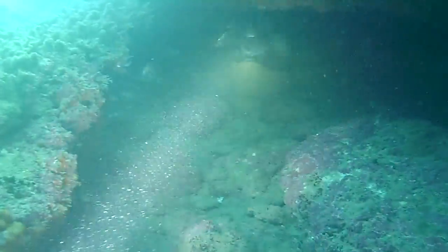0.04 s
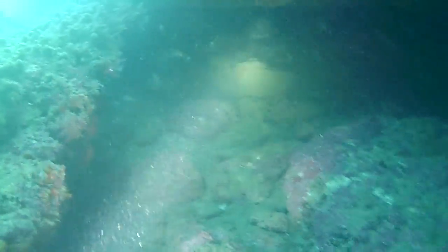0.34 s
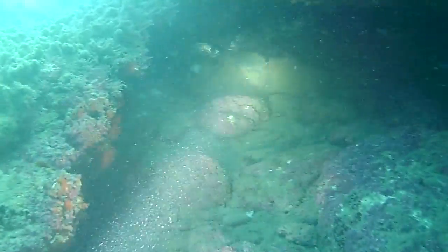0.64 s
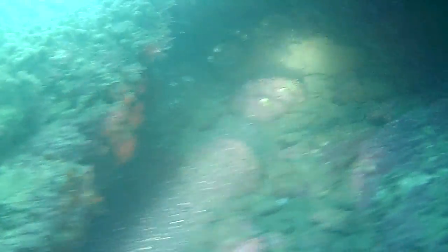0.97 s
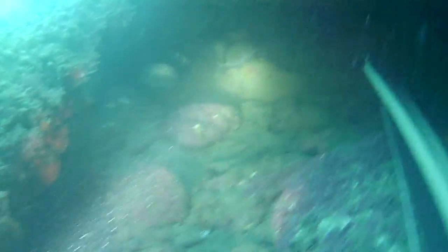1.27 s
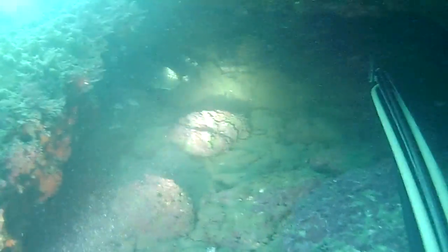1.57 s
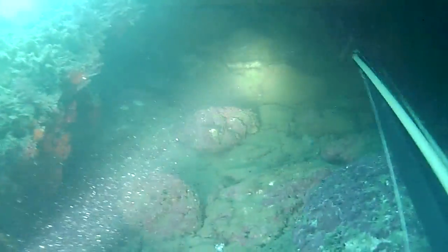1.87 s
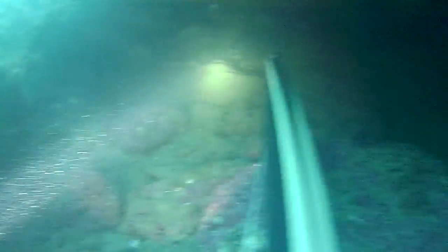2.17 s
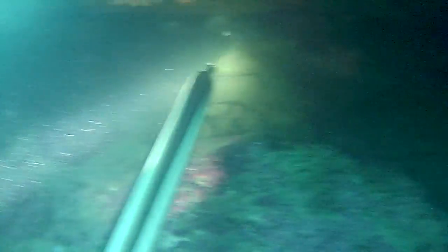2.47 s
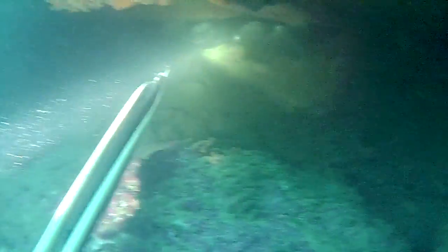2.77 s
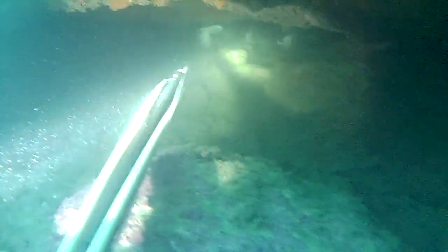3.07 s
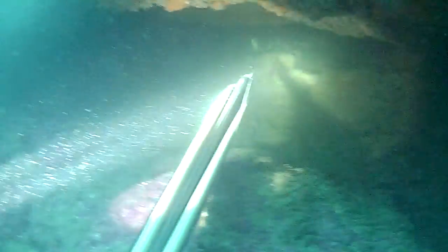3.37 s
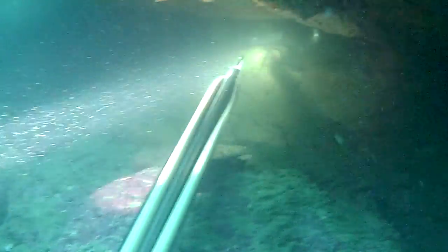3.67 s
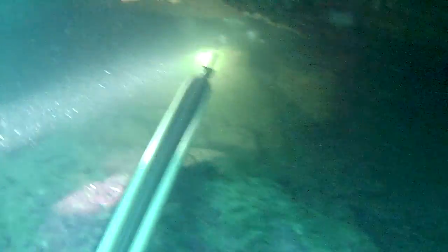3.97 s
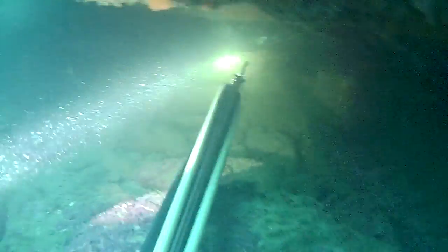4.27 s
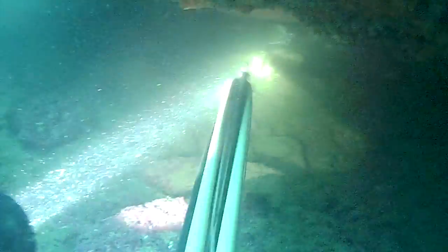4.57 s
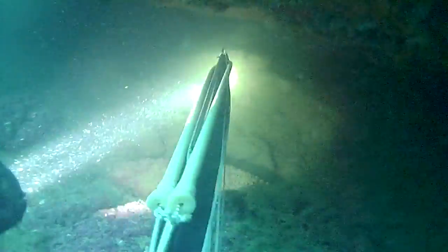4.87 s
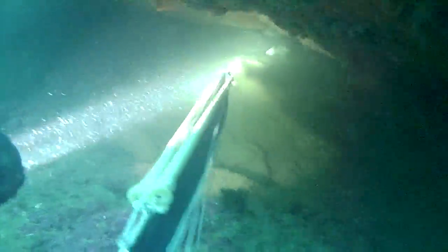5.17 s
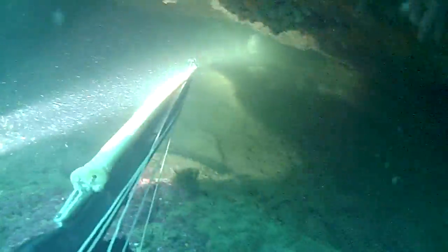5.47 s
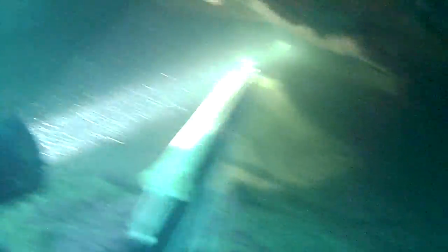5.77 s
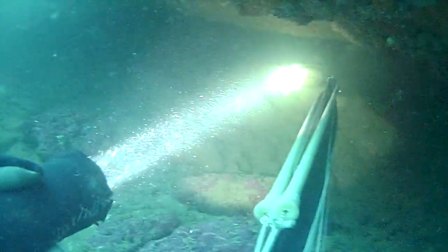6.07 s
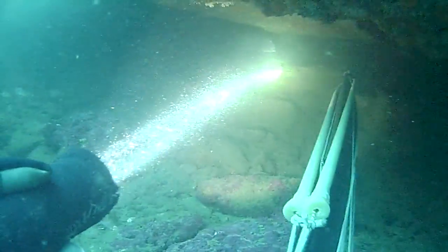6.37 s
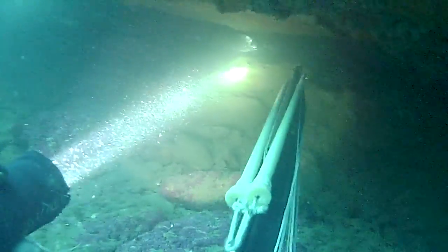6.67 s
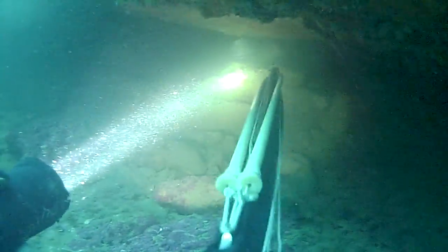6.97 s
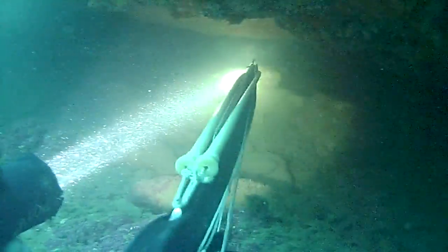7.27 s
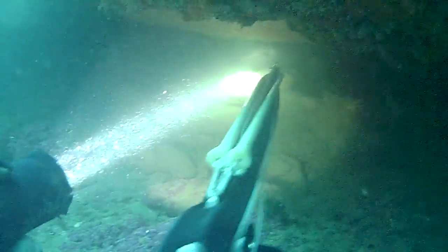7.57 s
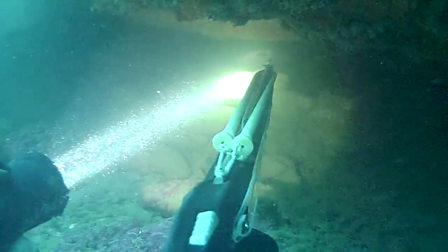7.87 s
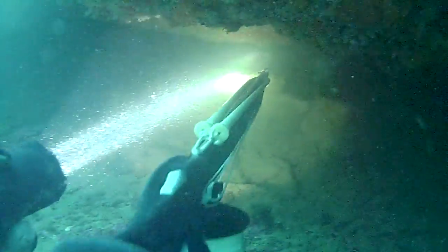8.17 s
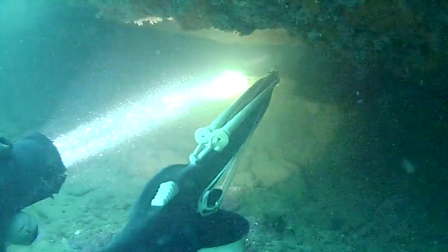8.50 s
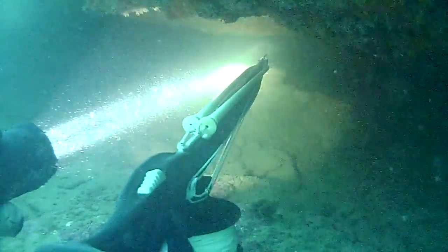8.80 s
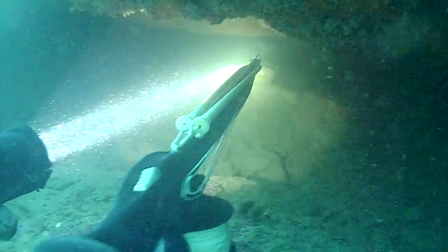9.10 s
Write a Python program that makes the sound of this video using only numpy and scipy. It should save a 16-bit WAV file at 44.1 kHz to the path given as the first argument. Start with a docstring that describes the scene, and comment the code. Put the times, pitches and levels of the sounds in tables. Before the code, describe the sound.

A low underwater rumble and soft fluttering wash run throughout, heard from inside a sealed camera housing, swelling within the first second. A diver's gear knocks irregularly on the case right at the microphones, several times a second, giving short hollow knocks, brighter clicks and brief scuffs. The two hardest, loudest blows land at about 1.2 and 2.2 seconds, each with a quick rebound; another sharp one comes at 4.2. Trapped air gives small low gulps around 0.6, 1.5, 1.7 and 4.5 seconds. After about 5 seconds the knocks become sparser and softer, and the water eases from around 6. Snapping shrimp make a faint, slowly fading crackle, with scattered close snaps, the sharpest near 7.7 seconds. A low thump, a scuff and a bright click come at about 8.7 seconds. The whole sound is muffled, with little high treble.

```python
"""Inside an underwater rock cave, on the two microphones of a camera in a sealed housing, carried in by
a diver with a speargun and a torch. Right at the microphones, gear knocks and scuffs ring the housing's
modes; a harder contact is brighter, and the heaviest blows overload the input. Moving water presses on
the case as a deep rumble and trapped air gurgles. Snapping shrimp crackle on the reef all around,
a few close by, the rest far off and fading."""
import sys
import numpy as np
from scipy import signal
from scipy.fft import rfft, irfft, next_fast_len
from scipy.io import wavfile
from scipy.ndimage import uniform_filter1d

SR = 44100
rng = np.random.default_rng(int(sys.argv[2]) if len(sys.argv) > 2 else 0)


def master(y):
    """Save y as 16-bit WAV."""
    cut = np.clip(np.atleast_2d(y).T, -1, 1)
    pcm = np.round(cut * 32767)  # scale
    wavfile.write(sys.argv[1], SR, pcm.astype(np.int16))


N = 407484
RING = 4096  # samples allowed for one contact to ring out

# Gear knocking on the housing. Each row: start in seconds, relative force in dB,
# contact corner in Hz (higher is harder), extra weight in the low modes in dB.
GEAR_KNOCKS = [(0.276, -3, 330, -23), (0.2845, -15, 4450, -7), (0.2967, -13, 2420, -2),
               (0.3803, -19.5, 640, 9), (0.5539, -16.5, 1210, 12.5), (0.5717, -15.5, 1080, 3),
               (0.5948, -5.5, 950, 3), (0.6257, -11, 520, 6), (0.789, -13.5, 480, -24),
               (1.01, -24.5, 1330, 5), (1.1161, -11.5, 2190, -1), (1.1697, 6.5, 4950, -3.5),
               (1.4327, -13.5, 1120, 2), (1.4631, -8, 580, 1), (1.4744, -4.5, 730, -7),
               (1.657, -13, 770, -2.5), (1.719, -10.5, 830, -11.5), (1.7664, -10.5, 560, -5),
               (2.0176, -17, 490, -1), (2.1197, -5, 4450, -11), (2.1735, -9, 4450, -6.5),
               (2.1805, 8, 5500, -15), (2.4272, -6, 955, -7), (2.5177, -17.5, 1400, -1),
               (2.5497, -13, 790, 4.5), (2.77, -11, 4450, -8), (2.8075, -14.5, 2720, 8),
               (2.852, -19, 2110, 13), (2.966, -12.5, 300, -4.5), (3.043, -2.5, 480, -10),
               (3.222, -10.5, 580, 3.5), (3.244, -30, 1420, 19), (3.3017, -24, 400, 15.5),
               (3.4536, -19, 470, 11), (3.6003, -11.5, 450, 5), (3.7146, -12, 750, 15),
               (3.8064, -5.5, 1460, 3), (3.8623, -11, 350, 0.5), (3.9304, -14, 310, 5.5),
               (4.2113, -3.5, 3570, 4.5), (4.2877, -12, 1830, -1), (4.3075, -9, 380, -3.5),
               (4.4351, -18.5, 620, 12.5), (4.4669, -15.5, 580, 24.5), (4.5314, -10, 390, 0),
               (4.6042, -7.5, 500, -3), (4.887, -20, 310, 10.5), (5.7369, -20.5, 470, -4.5),
               (6.1478, -6, 430, -29), (6.1571, -18, 730, 8.5), (6.3028, -16, 530, 10.5),
               (6.9792, -20, 300, 3.5), (7.293, -19, 400, -4), (7.694, -14, 400, -14),
               (7.8451, -15.5, 400, -9.5), (8.0001, -17.5, 780, 13.5), (8.2993, -17.5, 440, -3.5),
               (8.3531, -18, 830, 17.5), (8.6469, -6.5, 300, 10), (8.7191, -6.5, 3892, -2),
               (8.8499, -18.5, 490, -6), (9.063, -24, 560, -10)]
# Gear scuffing along it. Each row: start and end in seconds, level in dB, contact corner in Hz.
GEAR_SCUFFS = [(0.298, 0.33, -34, 1480), (0.593, 0.687, -29, 230), (1.179, 1.204, -21.5, 1411),
               (1.467, 1.495, -26, 610), (1.69, 1.748, -29, 527), (2.532, 2.572, -41.5, 1070),
               (2.774, 2.783, -35.5, 2294), (3.679, 3.728, -45, 606), (3.784, 3.806, -40, 1791),
               (4.188, 4.213, -32.5, 594.5), (4.247, 4.288, -41.5, 903), (4.403, 4.52, -45, 827.5),
               (4.466, 4.516, -28.5, 117.8), (4.832, 4.955, -44.5, 351), (5.656, 5.705, -50, 197),
               (6.15, 6.181, -43.5, 697), (6.599, 6.797, -57.5, 247), (6.97, 7.074, -52.5, 350.2),
               (7.283, 7.373, -59, 391.7), (8.641, 8.711, -38, 255.8), (8.648, 8.705, -50.5, 3001)]
# The case around the microphones. Each row: mode frequency in Hz, width in Hz, relative level in dB.
HOUSING_MODES = [(75, 11, -12), (115, 41, -12.5), (174, 35, -16.5), (230.4, 42, -11.5), (325, 210, -18),
                 (488, 46.5, -4.5), (576.4, 49, -7), (700, 74, -14.5), (960, 150, -12.5), (1132, 92, -4.5),
                 (1258, 52, -7.5), (1496, 290, -11), (1597, 110, -1), (1676, 250, -10), (1926, 150, -15.5),
                 (1986, 62, -21), (2210, 54, -24.5), (2354, 140, -24), (2754, 200, -16), (2810, 190, -15),
                 (3420, 60, -29), (3240, 300, -29)]
# Water pressing on the case, easing as the diver slows.
# Each row: time in seconds, relative rumble level in dB, relative wash level in dB.
WATER_FLOW = [(0.0, -41, -58.5), (0.62, -31.5, -48), (1.59, -29, -54), (2.13, -30, -45.5),
              (2.42, -29, -51.5), (2.65, -30.5, -48.5), (3.4, -31.5, -51.5), (4.25, -32, -49.5),
              (4.42, -29.5, -44.5), (4.63, -32.5, -47.5), (5.3, -33, -60), (6.18, -40, -52),
              (6.36, -44, -60.5), (8.26, -40.5, -60.5), (8.62, -36.5, -55.5), (8.85, -45, -57.5),
              (9.24, -40.5, -63)]
# The tone of the rumble and of the wash. Each row: frequency in Hz, relative gain in dB.
RUMBLE_SPECTRUM = [(4, -8.5), (10, -6), (20, -8.5), (32, -15), (45, -25), (65, -35.5), (100, -52.5),
                   (200, -64.5)]
WASH_SPECTRUM = [(40, -8.5), (70, 1), (125, 3), (175, -2.5), (228, -1), (350, -11), (500, -8.5),
                 (750, -16.5), (1100, -27), (2000, -39.5)]
# Larger air pockets gurgling free. Each row: start in seconds, starting pitch in Hz, gain in dB.
AIR_POCKETS = [(0.627, 240, -11.5), (0.916, 244, -27.5), (1.478, 307, -13), (1.719, 244, -20),
               (4.479, 141, -29), (4.50, 239, -17.5), (5.11, 242, -34.5), (6.083, 215.7, -36),
               (8.672, 214.9, -34)]
# The shrimp nearest the microphones. Each row: time of the snap in seconds, relative level in dB.
NEAR_SNAPS = [(0.048, -30.5), (.14, -31.5), (0.498, -20), (0.52, -27), (.678, -24), (0.765, -25.5),
              (0.882, -26.5), (1.279, -23), (1.305, -32), (1.613, -33), (1.667, -24), (2.005, -31),
              (3.026, -31.5), (3.502, -24), (4.657, -26.5), (4.941, -30.5), (5.045, -35), (5.155, -33.5),
              (5.404, -34), (5.505, -32.5), (6.68, -31), (7.338, -33.5), (7.7356, -11.5), (7.942, -28)]
# A close snap and the distant reef, through the case wall. Each row: frequency in Hz, relative gain in dB.
SNAP_SPECTRUM = [(300, -32.5), (800, -26), (1200, -10.5), (1700, 1.5), (2000, -3), (2250, -10.5),
                 (2750, 9.5), (3100, -1), (3400, 5.5), (4000, -8), (4600, -9)]
REEF_SPECTRUM = [(500, -19.5), (1000, -12.5), (1300, -7), (1450, -10), (1650, -4.5), (2000, -7),
                 (2250, -18.5), (2500, -7), (2750, 3), (3020, -6), (3200, 0), (3450, -0.5), (4000, -9.5),
                 (4600, -26.5)]


def knocks(modes, gain_db=1, chatter_db=-22, chatter_s=.016, chatter_count=4,
           bounce_s=.0185, first_bounce_db=-12.5, bounce_step_db=-5):
    """Gear hits the case right at the microphones and chatters faintly as it rebounds."""
    out = np.zeros(N)
    for start, db, contact_hz, weight_db in GEAR_KNOCKS:
        add(out, start, undb(db + gain_db) * strike(modes, contact_hz, weight_db, scatter_db=2.05))
        for lag in rng.random(chatter_count) * chatter_s:
            chatter = strike(modes, contact_hz, weight_db, scatter_db=3)
            add(out, start + lag, undb(min(db, 0) + chatter_db) * chatter)
        if db > 0:  # the heaviest blows spring back and land twice more, each time weaker
            for k in range(2):
                bounce = strike(modes, contact_hz, weight_db, scatter_db=5)
                bounce_db = db + first_bounce_db + k * bounce_step_db
                add(out, start + (k + 1) * bounce_s, undb(bounce_db) * bounce)
    return out


def scuffs(modes, slips_per_s=700, spread_db=3):
    """Gear sticks and slips along the case: a short irregular run of contacts that swells and fades."""
    out = np.zeros(N)
    for start, end, db, contact_hz in GEAR_SCUFFS:
        length = int((end - start) * SR)
        rub = np.zeros(length + RING)
        for place in rng.random(int(slips_per_s * length / SR) + 1):
            size = np.sqrt(np.sin(np.pi * place)) * undb(spread_db * rng.standard_normal())
            slip_hz = contact_hz * np.exp(.3 * rng.standard_normal())
            i = int(place * length)
            rub[i:i + RING] += size * strike(modes, slip_hz, weight_db=0, scatter_db=8.5)
        add(out, start, undb(db) * unit(rub) * np.sqrt(length / len(rub)))
    return out


def loose_gear(modes, wash_db, count=70, gain_db=18, spread_db=4, contact_hz=420):
    """Loose gear bumps softly on the case, more strongly when the diver moves faster."""
    out = np.zeros(N)
    for place, size in zip(rng.random(count), rng.standard_normal(count)):
        db = wash_db[int(place * N)] + gain_db + spread_db * np.clip(size, -2, 1)
        add(out, place * N / SR, undb(db) * strike(modes, contact_hz, weight_db=0, scatter_db=1))
    return out


def strike(modes, contact_hz, weight_db, scatter_db, detune=0.048, lightness=0.39):
    """One contact on the case: a soft one cannot reach the high modes, a heavy one shoves the lowest."""
    s = 1j * np.fft.rfftfreq(RING, 1 / SR) / contact_hz
    low_share = 1 / (1 + (np.array(HOUSING_MODES)[:, 0] / 220) ** 4)  # modes below about 220 Hz
    spot_db = scatter_db * rng.standard_normal(len(modes))  # each spot favours different modes
    gains = undb(weight_db * low_share + spot_db)
    # small hard parts spring back at once and leave less push for the low modes
    low_cut = 1 - lightness / (1 + 6 * s)
    push = low_cut / ((1 + s) * (1 + s + s * s))  # rolls off above the contact corner
    ring = irfft(gains @ modes * push)
    # a soft contact stays on the wall for longer and pulls its modes a little off pitch
    pull = 1 + detune * min(600 / contact_hz, 1) * rng.standard_normal()
    return np.interp(np.arange(RING) * pull, np.arange(RING), ring, right=0)


def housing_modes():
    """Frequency response of each case mode; neighbours swing in opposite senses, so a knock swells in."""
    f = np.maximum(np.fft.rfftfreq(RING, 1 / SR), 1)
    modes = np.array([(-1) ** k * undb(db) / (1 + 1j * (f * f - hz * hz) / (f * width))
                      for k, (hz, width, db) in enumerate(HOUSING_MODES)])
    return modes / np.abs(irfft(modes.sum(axis=0))).max()


def water(rumble_db, wash_db, rumble_gain_db=5, eddy_db=4):
    """Slow pressure swings right on the case, and a soft wash that flutters with the eddies."""
    rumble = unit(colour(rng.standard_normal(N), RUMBLE_SPECTRUM))
    wash = unit(colour(rng.standard_normal(N), WASH_SPECTRUM))
    flutter_db = eddy_db * wander(rate_hz=22)
    return rumble * undb(rumble_db + rumble_gain_db) + wash * undb(wash_db + flutter_db)


def gurgles(wash_db, count=75, gain_db=8, spread_db=3, pitch_hz=240, pitch_spread=0.52):
    """Trapped air comes free: a few clear gulps, and faint blips whose level follows the flow."""
    out = np.zeros(N)
    for start, hz, db in AIR_POCKETS:
        add(out, start, undb(db) * bubble(hz))
    for place, (size, pitch) in zip(rng.random(count), np.clip(rng.standard_normal((count, 2)), -2, 2)):
        db = wash_db[int(place * N)] + gain_db + spread_db * size
        add(out, place * N / SR, undb(db) * bubble(pitch_hz * np.exp(pitch_spread * pitch)))
    return out


def bubble(hz, cycles=15, rise=0.057):
    """A pocket of air rings for some cycles, rising slightly in pitch."""
    age = np.arange(2 * RING) / SR * hz / cycles  # reaches 1 when the ring is 60 dB down
    swell = 1 - np.exp(-2 * age * cycles)
    decay = np.exp(-np.log(1000) * age)
    return swell * decay * np.sin(2 * np.pi * cycles * age * (1 + rise * age))


def shrimp(near_db=20, far_db=3, hiss_db=-3, spread_db=4.5, count=1700, reef_db=-55.5, fade_db_per_s=1.04):
    """A few close snaps over a distant crowd, whose fizz fades steadily on the way into the cave."""
    near, far = np.zeros(N), np.zeros(N)
    for start, db in NEAR_SNAPS:
        add(near, start, undb(db + near_db) * snap(tail_t60_s=0.036))
    sizes = undb(spread_db * np.minimum(rng.exponential(size=count), 5))
    for start, size in zip(rng.random(count) * N / SR, sizes):
        add(far, start, size * snap(tail_t60_s=0.04))
    crackle = undb(far_db) * unit(colour(far, REEF_SPECTRUM))
    hiss = undb(hiss_db) * unit(colour(rng.standard_normal(N), REEF_SPECTRUM))
    fade = undb(reef_db - fade_db_per_s * np.arange(N) / SR)
    return colour(near, SNAP_SPECTRUM) + fade * (crackle + hiss)


def snap(tail_t60_s, tail_db=-21):
    """A collapsing bubble: one sharp pulse, then its scatter from the rocks."""
    t = np.arange(RING // 2) / SR
    pulse = undb(tail_db) * rng.standard_normal(len(t)) * np.exp(-np.log(1000) * t / tail_t60_s)
    pulse[0] += 1
    return pulse


def undb(db):
    """Decibels to gain."""
    return 10 ** (np.asarray(db) / 20)


def unit(x):
    """Scale to rms 1."""
    return x / np.sqrt(np.mean(x ** 2))


def curve(rows, column):
    """One column of a table, joined by straight lines in time."""
    rows = np.array(rows)
    return np.interp(np.arange(N) / SR, rows[:, 0], rows[:, column])


def add(out, start_s, sound):
    """Mix a sound in at its start time."""
    i = int(start_s * SR)
    out[i:i + len(sound)] += sound[:max(N - i, 0)]


def colour(x, points):
    """Causal filter whose gain follows (Hz, dB) points."""
    size = next_fast_len(len(x) + RING, True) // 2 * 2
    hz, db = np.transpose(points)
    f = np.maximum(np.fft.rfftfreq(size, 1 / SR), 1)
    gain = undb(np.interp(np.log(f), np.log(hz), db))
    cepstrum = irfft(np.log(gain))
    # minimum phase, so nothing rings ahead of a snap
    cepstrum[1:size // 2] *= 2
    cepstrum[size // 2 + 1:] = 0
    return irfft(rfft(x, size) * np.exp(rfft(cepstrum)))[:len(x)]


def wander(rate_hz):
    """Random levels, each held for 1 / rate_hz seconds, smoothed twice and scaled to rms 1."""
    hold = int(SR / rate_hz)
    steps = np.repeat(rng.standard_normal(N // hold + 1), hold)
    return unit(uniform_filter1d(uniform_filter1d(steps, hold), hold)[:N])


def scene(right_lead_s=.000124):
    """Everything reaches both microphones through the same case, the right one a moment sooner."""
    modes = housing_modes()
    rumble_db, wash_db = curve(WATER_FLOW, column=1), curve(WATER_FLOW, column=2)
    sea = water(rumble_db, wash_db) + shrimp() + gurgles(wash_db)
    gear = knocks(modes) + loose_gear(modes, wash_db) + scuffs(modes)
    left = gear + sea
    lead = np.exp(2j * np.pi * np.fft.rfftfreq(N, 1 / SR) * right_lead_s)
    return np.array([left, irfft(rfft(left) * lead, N)])


def record(dry, input_stop_hz=5100, top_hz=16000):
    """The microphones feed a narrow-band input that overloads at full scale on the heaviest blows."""
    input_lowpass = signal.cheby2(12, 70, input_stop_hz, fs=SR, output="sos")
    output_lowpass = signal.ellip(8, .2, 70, top_hz, fs=SR, output="sos")
    overloaded = np.clip(signal.sosfilt(input_lowpass, dry), -1, 1)
    return signal.sosfilt(output_lowpass, overloaded)


dry = scene()
out = record(dry)
master(out)
```